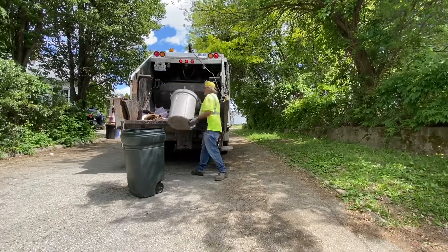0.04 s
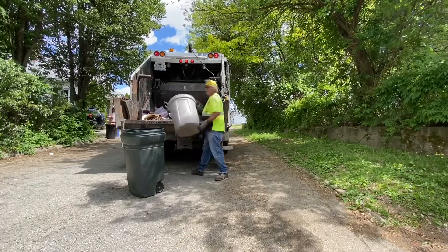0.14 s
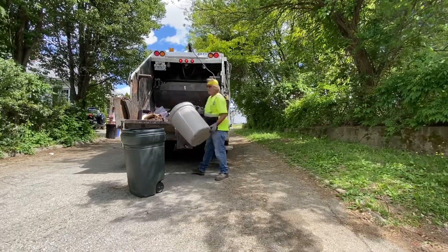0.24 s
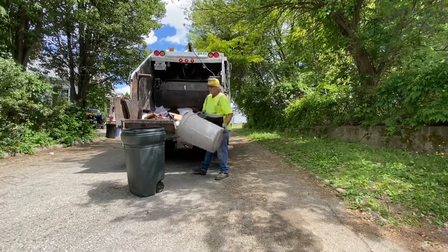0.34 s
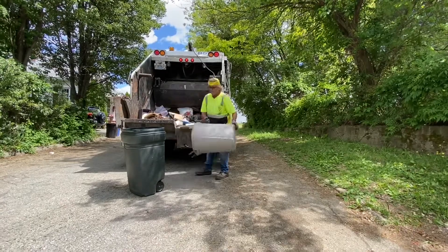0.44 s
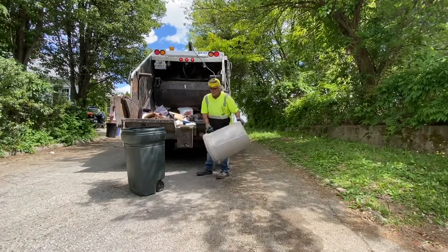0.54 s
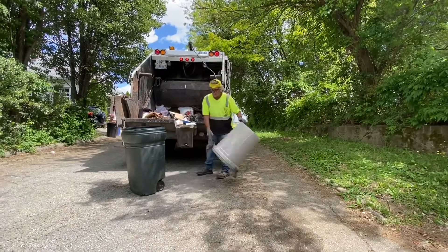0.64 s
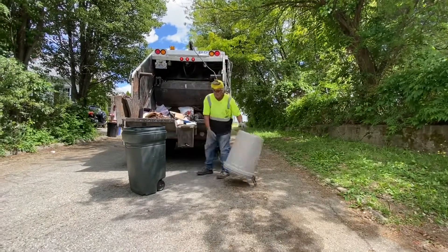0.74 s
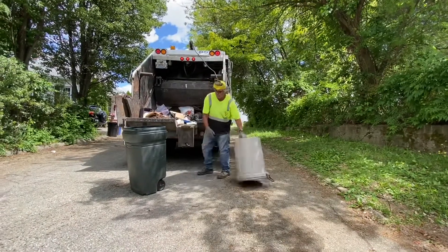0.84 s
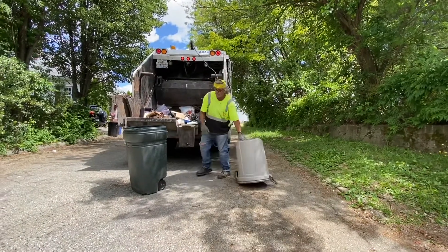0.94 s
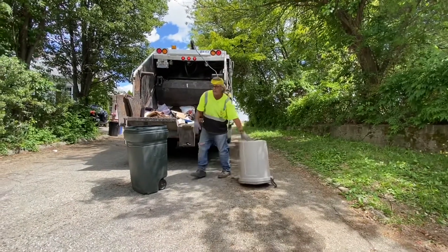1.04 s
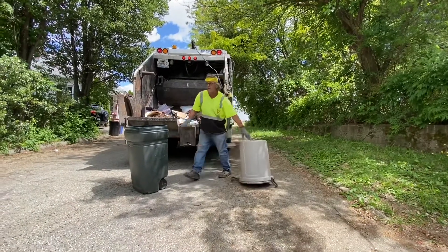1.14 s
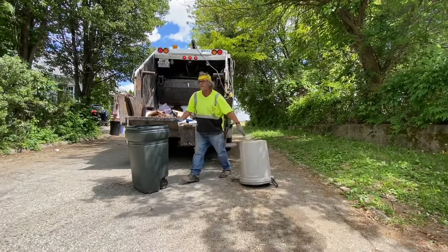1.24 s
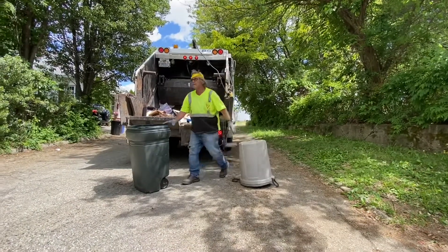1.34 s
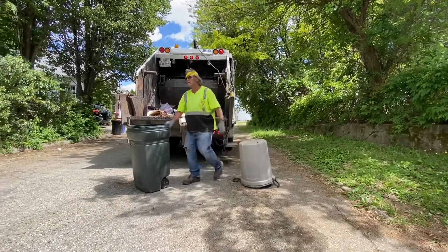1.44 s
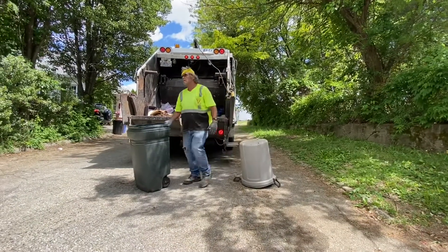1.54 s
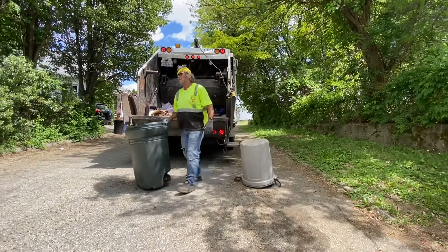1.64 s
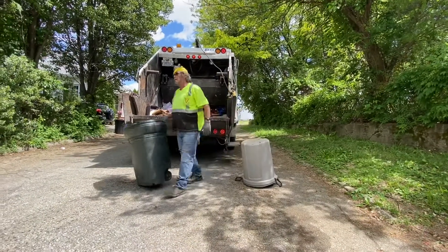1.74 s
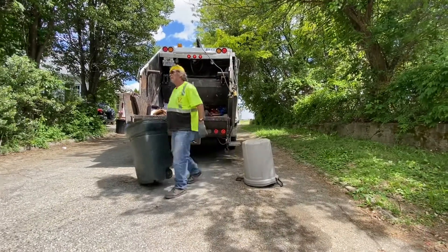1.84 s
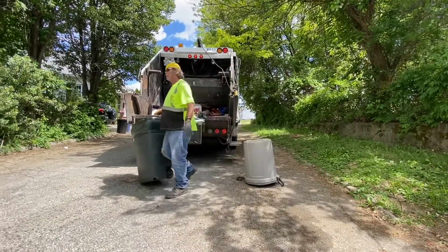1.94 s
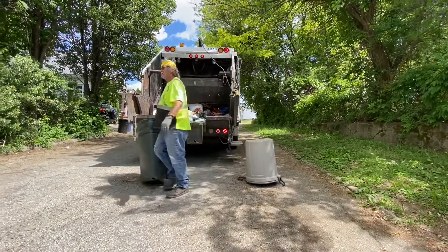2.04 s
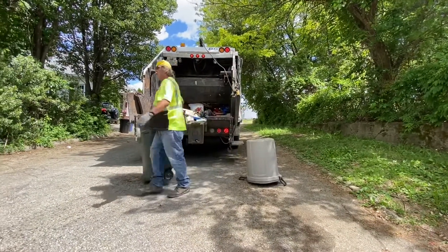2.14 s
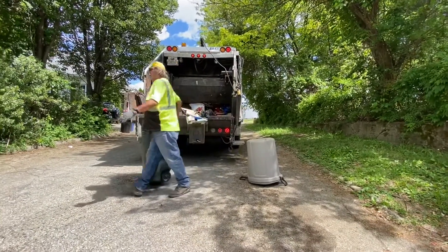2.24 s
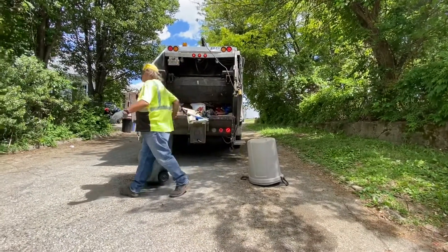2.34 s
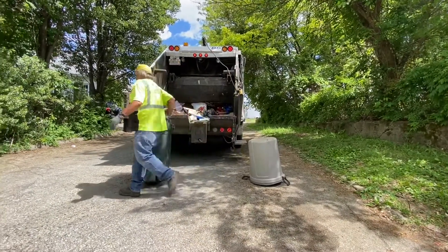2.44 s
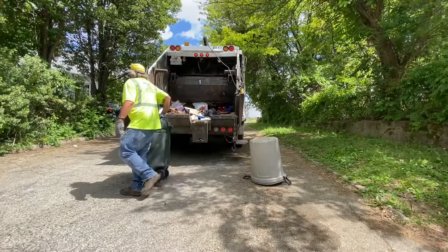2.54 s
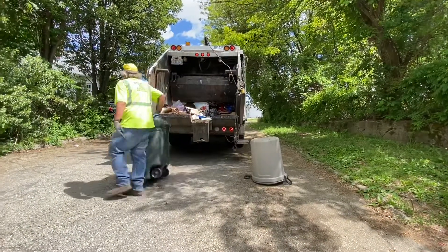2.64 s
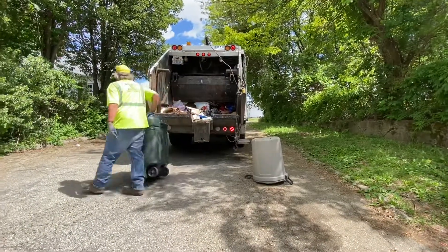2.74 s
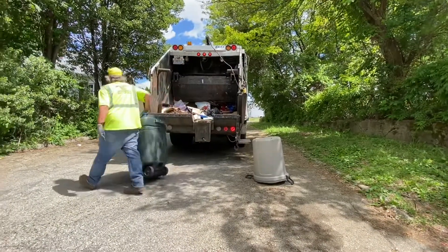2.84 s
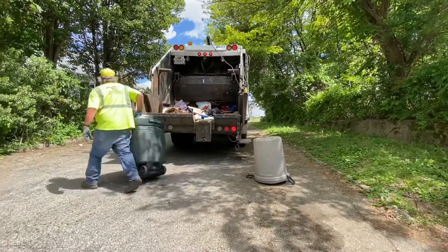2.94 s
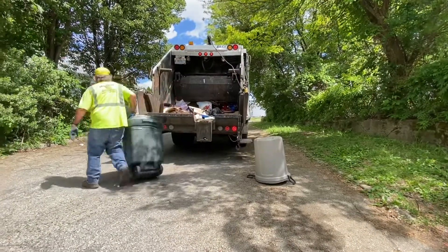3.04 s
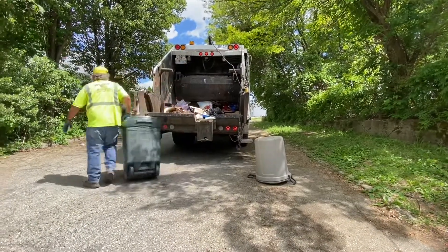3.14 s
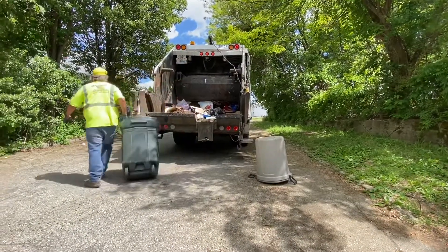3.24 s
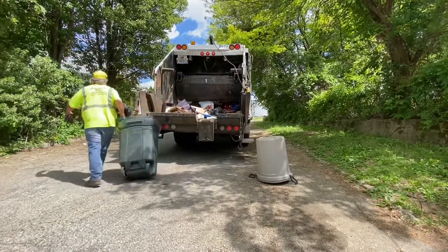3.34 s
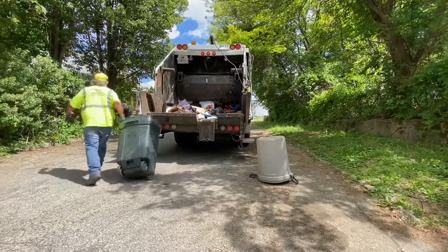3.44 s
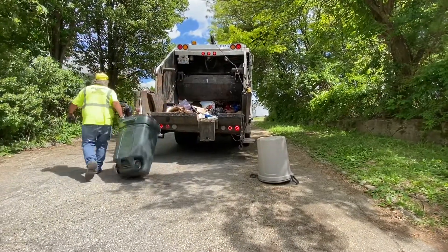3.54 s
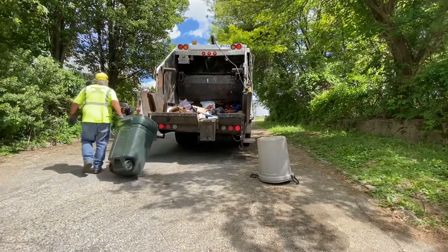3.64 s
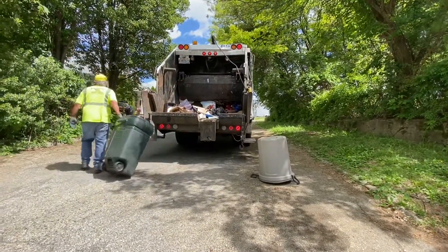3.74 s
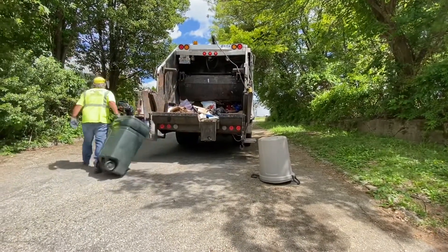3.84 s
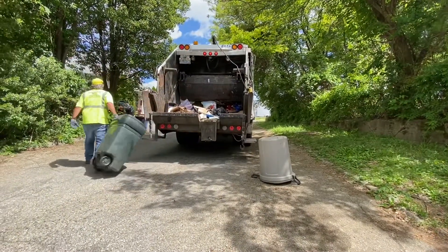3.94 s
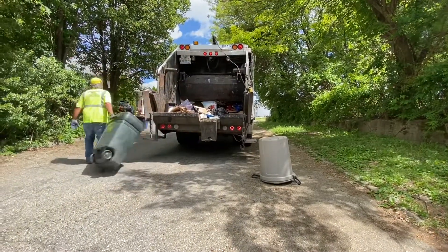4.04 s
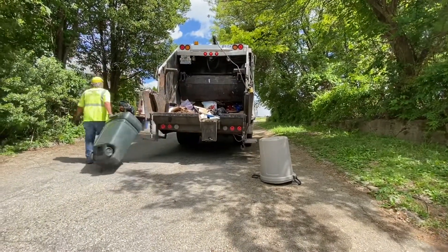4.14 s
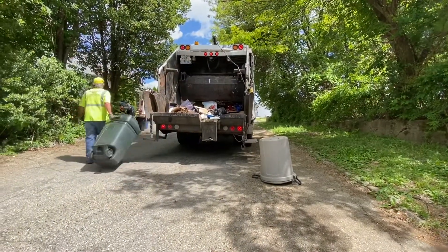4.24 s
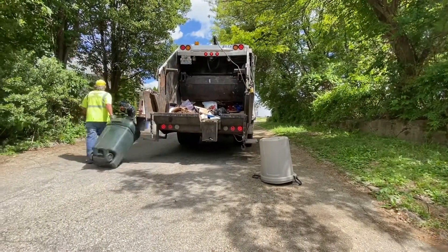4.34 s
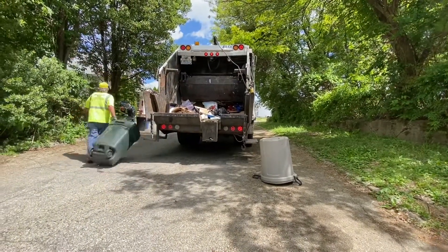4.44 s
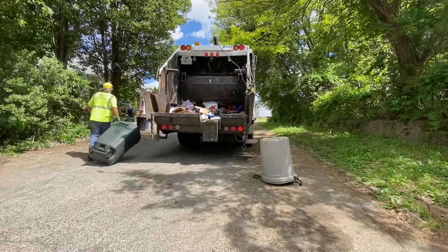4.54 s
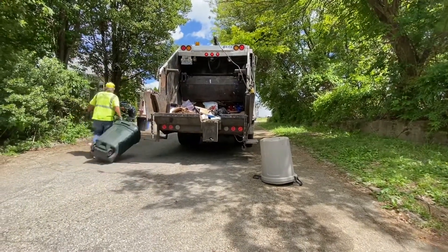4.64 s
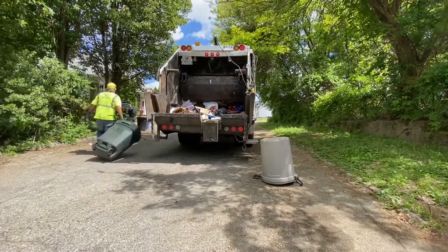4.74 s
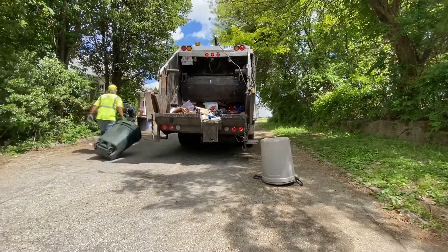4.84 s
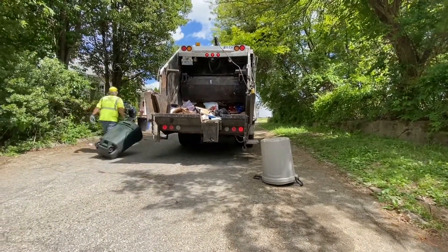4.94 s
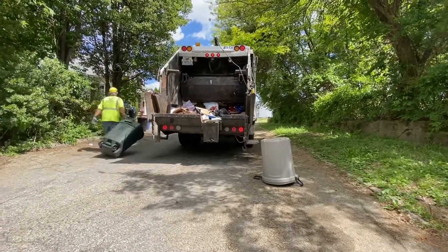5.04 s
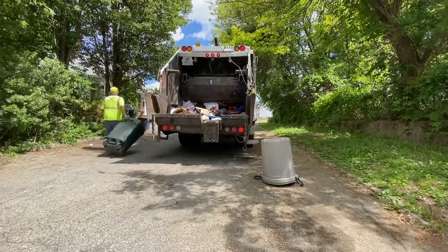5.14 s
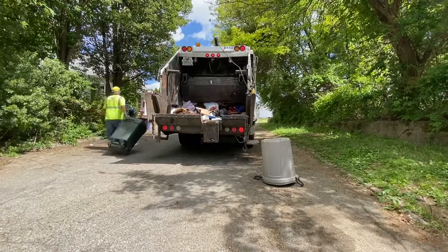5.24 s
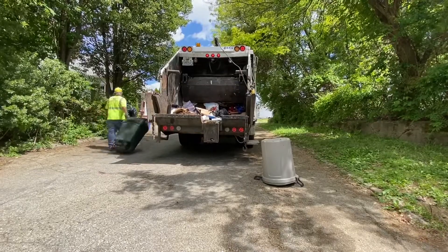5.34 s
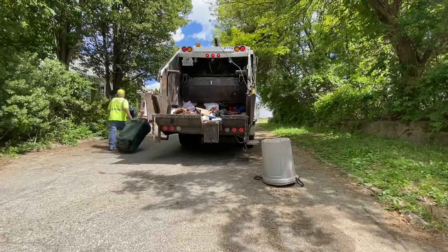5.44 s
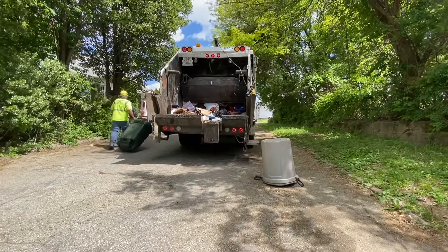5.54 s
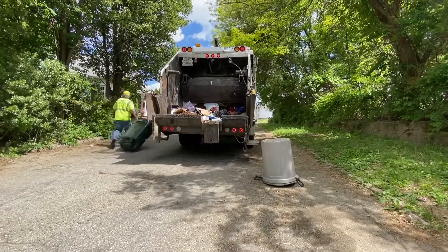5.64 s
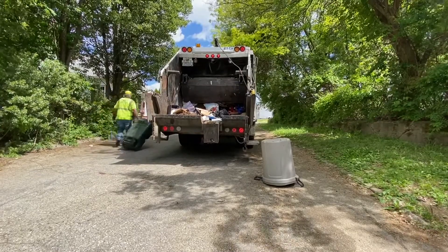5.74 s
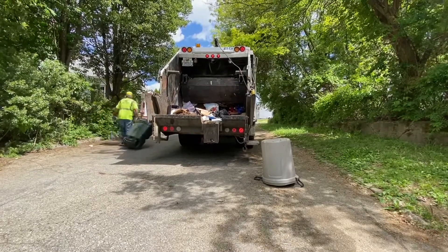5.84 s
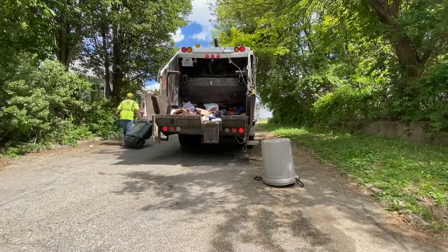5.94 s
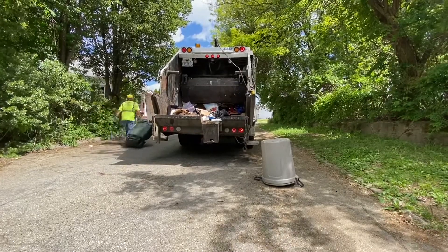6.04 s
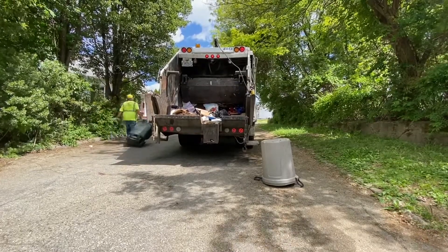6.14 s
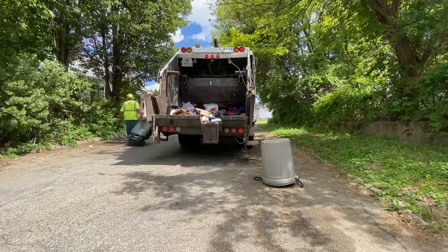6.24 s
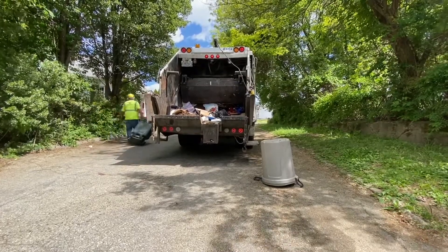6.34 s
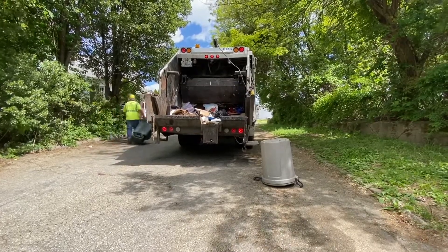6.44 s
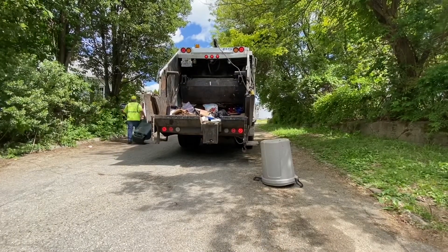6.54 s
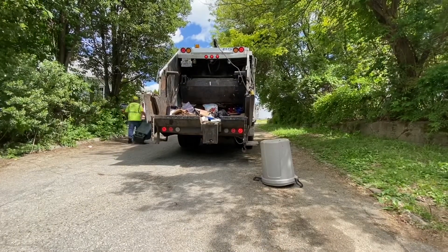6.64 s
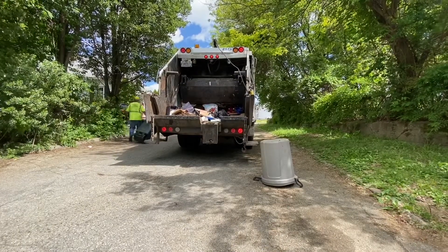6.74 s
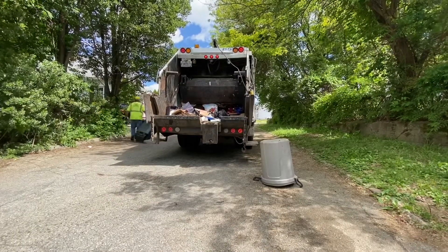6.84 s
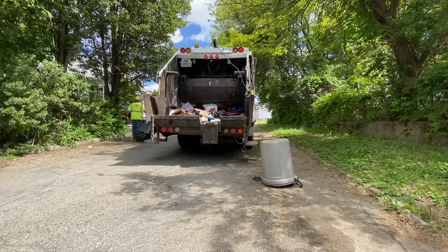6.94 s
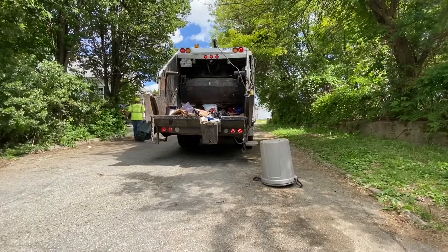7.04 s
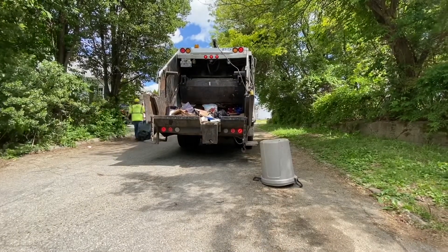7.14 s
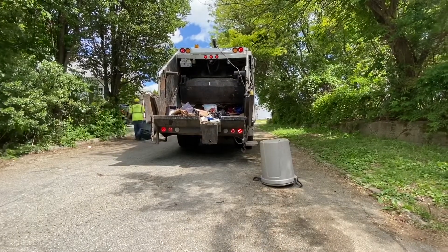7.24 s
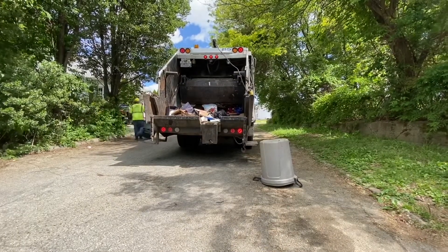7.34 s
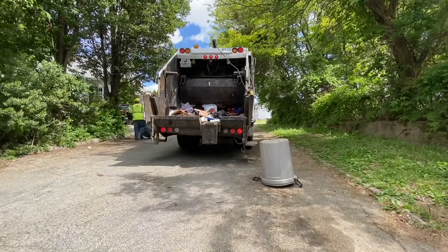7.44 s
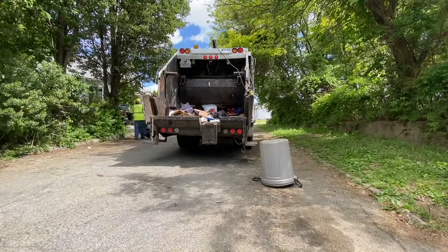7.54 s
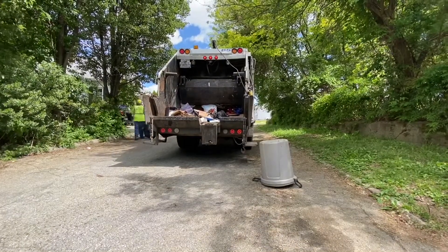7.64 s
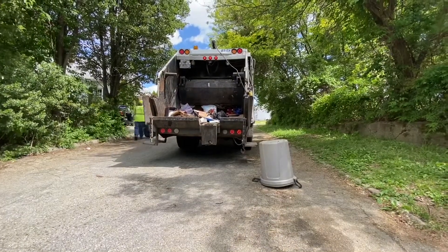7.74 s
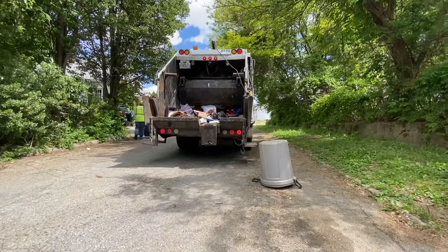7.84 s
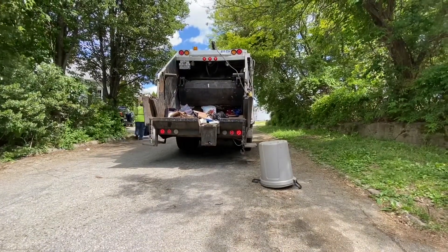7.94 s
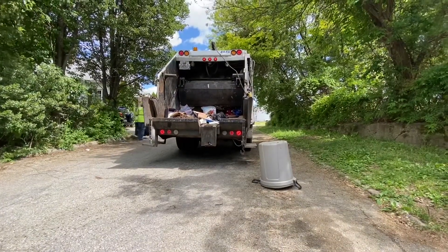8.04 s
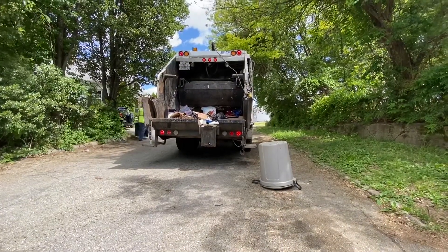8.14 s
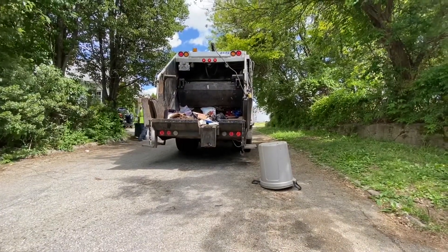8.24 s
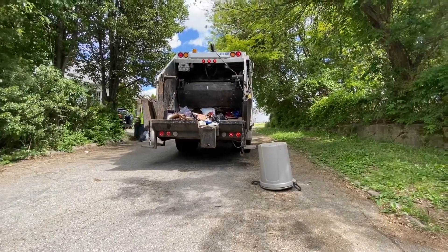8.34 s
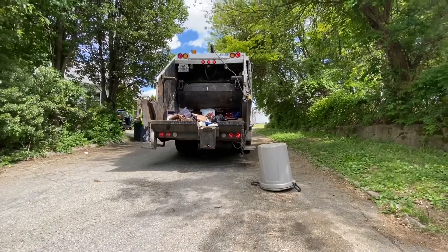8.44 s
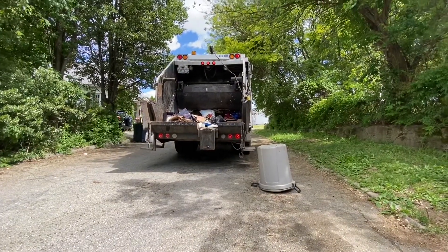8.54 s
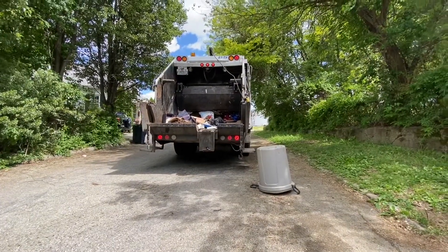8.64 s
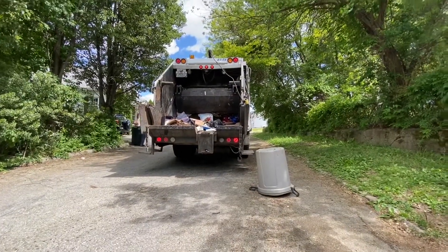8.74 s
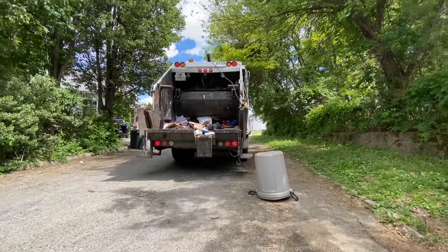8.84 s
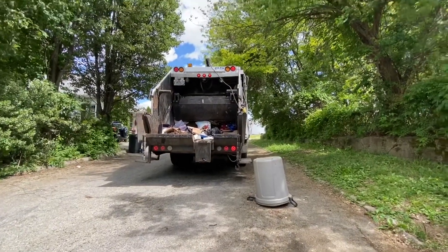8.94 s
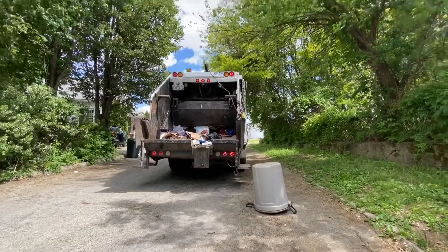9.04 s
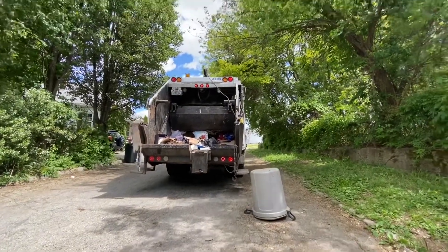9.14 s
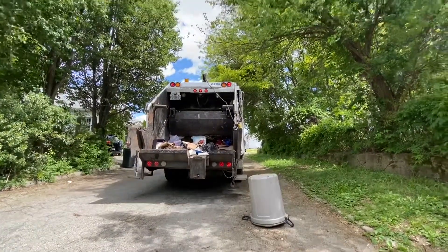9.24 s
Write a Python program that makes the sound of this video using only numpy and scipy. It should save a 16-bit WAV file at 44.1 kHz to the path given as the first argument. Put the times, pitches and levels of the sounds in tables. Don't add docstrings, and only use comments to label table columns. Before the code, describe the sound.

Steady refuse truck idle on a leafy lane; a hollow plastic can drops and rocks, a cart drums and scrapes away, and steel clanks.

```python
import sys
import numpy as np
from scipy import signal
from scipy.fft import rfft, irfft, next_fast_len
from scipy.io import wavfile
from scipy.ndimage import map_coordinates

SR = 44100
rng = np.random.default_rng(int(sys.argv[2]) if len(sys.argv) > 2 else 0)


def boost(x):
    u = np.asarray(x, float) / 20
    return 10 ** u


def bounce(signal):
    frames = np.transpose(np.atleast_2d(signal))
    limited = np.clip(frames, -1, 1)
    pcm = np.round(limited * 32767).astype(np.int16)
    wavfile.write(sys.argv[1], SR, pcm)


N = 409248
TIME = np.arange(N) / SR


def unit(x):
    return x / np.sqrt(np.mean(x ** 2) + 1e-20)


def along(points, hz):
    f, v = np.transpose(points)
    return np.interp(np.log(hz + 1), np.log(f + 1), v)


def curves(rows):
    s, *cols = np.transpose(rows)
    return [np.interp(TIME, s, c) for c in cols]


def wobble(rate):
    knots = rng.standard_normal(int(N * rate / SR) + 4)
    return map_coordinates(knots, [TIME * rate])


def filtered(x, response):
    m = 2 * next_fast_len(N // 2 + 8192)
    return irfft(rfft(x, m) * response(np.fft.rfftfreq(m, 1 / SR)), m)[..., :N]


def resonant(modes, f):
    total = 0
    for k, (centre, width, db) in enumerate(modes):
        total = total + (-1) ** k * boost(db) * 1j * f * width / (centre * centre - f * f + 1j * f * width)
    return total


def causal(points):
    cep = irfft(np.log(boost(along(points, np.fft.rfftfreq(4096, 1 / SR))) + 1e-6))
    cep[1:2048] *= 2
    cep[2049:] = 0
    h = irfft(np.exp(rfft(cep)))
    return h / np.linalg.norm(h)


def placed(x, lead, pan_db):
    side = np.array([[.5], [-.5]])
    return filtered(x, lambda hz: boost(side * pan_db(hz)) * np.exp(2j * np.pi * side * along(lead, hz)))


def rush(colour, alike, gain):
    def mid_and_side(hz):
        turn = np.arccos(np.clip(along(alike, hz), -1, 1)) / 2
        return colour(hz) * [np.cos(turn), np.sin(turn)]

    mid, side = filtered(gain * rng.standard_normal((2, N)), mid_and_side)
    return unit(np.array([mid + side, mid - side]))


def clicks(rows, t60_s):
    out, t = np.zeros(N + SR), np.arange(900) / SR
    for s, db, hz in rows:
        grit = np.convolve(rng.standard_normal(len(t) + 2), [1, -.3, -.7], 'valid')
        snap = 1.7 * np.sin(2 * np.pi * hz * t) + 1.55 * grit * (.7 + boost(-60 * t / .008))
        out[round(s * SR):][:len(t)] += boost(db - 18.0 - 60 * t / t60_s) * snap
    return out[:N]


def rings(rows, sag_s=1e3, rough_db=3):
    out, t = np.zeros(N + SR), np.arange(SR // 4) / SR
    for s, db, hz, t60 in rows:
        turns = hz * sag_s * np.log1p(t / sag_s)
        rattle = np.clip(map_coordinates(rng.standard_normal(90), [t * 300]), -2, 1.5)
        flicker = rough_db * rattle * np.minimum(t / .006, 1)
        rise = 1 - np.exp(-t / min(max(.001, 1.5 / hz), t60 / 15))
        out[round(s * SR):][:len(t)] += boost(db + flicker - 60 * t / t60) * rise * np.sin(2 * np.pi * turns)
    return out[:N]


# pitch_hz, level_db
HOLLOW_TONES = [(78, -3.5), (108, -11), (140, 2), (185, -1.5), (235, -7.5), (300, -12.5)]
BOOM_PER_WEIGHT = 0.92


def blows(events, crack, knock, sharp_db, boom_t60_s, crack_db, knock_db, boom_db):
    parts, t = np.zeros((3, 2, N + SR)), np.arange(SR // 3) / SR
    for s, db, weight, t60, hz in events:
        noise = rng.standard_normal((3, 1, len(t))) + .35 * rng.standard_normal((3, 2, len(t)))
        chatter = boost(3 * np.repeat(rng.standard_normal(len(t) // 90 + 1), 90)[:len(t)])
        rise_s = .0025 + .006 / (1 + boost(db + max(weight, 0) + 24))
        rise = 1 - np.exp(-t / rise_s)
        fade = boost(-60 * t / max(t60, .01))

        first_snap = 1.43 * boost(-60 * t / 0.0083) * (1 - np.exp(-4 * t / rise_s))
        snap = boost(crack_db) * chatter * (fade * rise + first_snap)

        first_push = 0.68 * 0.0025 / rise_s * np.exp(-((t - rise_s) / 0.0009) ** 2)
        ring = boost(knock_db + weight) * (fade ** 0.7 * rise + first_push)

        swell = boost(boom_db + BOOM_PER_WEIGHT * weight - 60 * t / boom_t60_s) * (1 - np.exp(-t / 0.0075))
        air = 0
        for mode, level in HOLLOW_TONES:
            air = air + boost(level) * np.sin(2 * np.pi * (mode * rng.normal(1, 0.0714) * t + rng.random()))

        favoured = boost(sharp_db) * signal.lfilter(*signal.iirpeak(hz, 7, SR), snap * noise[2])
        contact = np.array([snap * noise[0], ring * noise[1], favoured + swell * air])
        parts[:, :, round(s * SR):][..., :len(t)] += boost(db) * contact
    wall = irfft(resonant(knock, np.fft.rfftfreq(8192, 1 / SR)))[:4096]
    colours = np.array([causal(crack), wall / np.linalg.norm(wall)])
    coloured = signal.oaconvolve(parts[:2, :, :N], colours[:, None], axes=2)[..., :N]
    return coloured.sum(axis=0) + parts[2, :, :N]


# pitch_hz, t60_s
LANE = [(150, 0.26), (1000, 0.18), (8000, 0.15)]


def lane(x):
    hz, t, z = signal.stft(rng.standard_normal((2, SR // 2)), SR, nperseg=256)
    fading = z * boost(-60 * t / along(LANE, hz)[:, None])
    tail = signal.istft(fading, SR, nperseg=256)[1]
    late = np.pad(x, ((0, 0), (500, 0)))
    return signal.fftconvolve(late, tail / np.linalg.norm(tail[0]), axes=1)[:, :N]


# start_s, hold_s, drumming_db, grit_under_it_db
TUGS = [(1.57, 0.12, -43.5, -2), (1.86, .1, -59, -4), (3.1, 0.14, -45, -27), (3.66, 0.081, -64, 5),
        (3.79, 0.091, -33, -15.5), (4.34, 0.049, -30, -27), (4.68, 0.22, -34.5, -12),
        (5.325, 0.18, -33.5, -25), (5.7, 0.27, -37.5, -6), (6.02, 0.615, -40, -10), (6.66, 0.38, -42, -20),
        (7.1, 0.19, -42, -17), (7.55, .16, -44.5, -1), (8.3, 0.12, -39, -20)]
# start_s, hold_s, drumming_db, grit_under_it_db
ROLL = (3.5, 7.5, -44, -38)
TUG_ATTACK_S, TUG_RELEASE_T60_S = .05, 0.23


def tugs():
    shell, grit = np.zeros((2, N))
    for s, hold, db, grit_db in [*TUGS, ROLL]:
        rise = np.clip((TIME - s) / TUG_ATTACK_S + 1, 0, 1) ** 2
        shape = rise * boost(-60 * np.maximum(TIME - s - hold, 0) / TUG_RELEASE_T60_S)
        shell = shell + boost(db) * shape
        grit = grit + boost(db + grit_db) * shape
    return shell, grit


# start_s, strength_db
WIND = [(0.0, -41), (0.52, -42.5), (0.85, -41), (1.86, -40), (2.04, -42), (4.29, -41), (4.52, -38),
        (5.81, -38.5), (7.62, -38), (7.88, -44.5), (8.84, -58), (9.28, -44)]
# pitch_hz, level_db
DEEP = [(12, -47), (20, -51), (49, -5), (86, -8), (100, -7), (130, -9), (220, -120)]
# pitch_hz, level_db
BOOM = [(60, -8), (90, -3.5), (115, 4.5), (150, 2), (230, -8), (400, -45)]
DEEP_DB = 8.5
BOOM_DB, BOOM_FOLLOWS = -42, 0.46
EXHAUST_BOOM_DB, HOLLOW_DB = -52, -3.5


def rumble():
    wind_db, = curves(WIND)
    deep = rush(lambda hz: boost(along(DEEP, hz)), [(60, -0.034)], boost(1.2 * wobble(21)))
    boom = rush(lambda hz: boost(along(BOOM, hz)), [(100, 0.19)], boost(0.41 * wobble(24)))
    gusts = boost(BOOM_DB + BOOM_FOLLOWS * (wind_db - wind_db.mean())) + boost(EXHAUST_BOOM_DB)
    hollow = boost(HOLLOW_DB) * tugs()[0]
    return boost(wind_db + DEEP_DB) * deep + (gusts + hollow) * boom


# start_s, level_db
PUMP = [
    (0, -36),
    (.7, -34),
    (2, -34),
    (3.5, -32),
    (4.5, -34.5),
    (6, -33.5),
    (8.5, -35.5),
    (9.28, -34.5),
]
# pitch_hz, level_db (per Hz)
ENGINE = [(120, -23), (200, 7.5), (330, -1), (500, 1), (980, -9), (1400, -8.5), (2800, -9.5), (4500, -18),
          (6500, -18.5), (11000, -18), (16000, -25)]
# pitch_hz, width_hz, level_db
PANELS = [(508, 137, -0.5), (815, 69, 6), (1112, 58, 11.5), (1400, 60, 8.5), (1750, 314, 1.5),
          (3185, 39, 4), (3387, 27, 7), (4660, 450, 8), (6100, 44, -8), (6300, 230, -17)]
# pitch_hz, likeness (-1 to 1)
ALIKE = [(60, .3), (180, 0.16), (550, 0.47), (1650, 0.22), (2500, 0.092), (3200, 0.56), (4000, 0.043),
         (8000, 0.7), (10000, 0.5), (11000, 0.38), (16000, .97)]
PUMP_HZ = 161.6


def truck():
    cycle = np.cumsum(11.0 + 0.13 * wobble(2.4)) / SR
    cylinder_db = np.array([0, -1.5, -.5, -2, -.3, -1.2])[(3 * cycle).astype(int) % 6]
    firing = boost(cylinder_db - 2.5 * (3 * cycle % 1))
    body = lambda hz: boost(along(ENGINE, hz)) * (1 + 2.15 * abs(resonant(PANELS, hz)))
    clatter = boost(-38.0 - 0.0033 * TIME) * rush(body, ALIKE, firing)

    load_db, = curves(PUMP)
    turn = 2 * np.pi * PUMP_HZ * TIME + .1 * wobble(12)
    tone = np.sin(turn) + boost(-26) * np.sin(2 * turn)
    return clatter + np.sqrt(2) * boost(load_db + .7 * wobble(14)) * tone


def exhaust():
    level_db = -45 - 12 * np.clip(TIME - 7.6, 0, 1) + 3 * wobble(4.5)
    return boost(level_db) * np.sin(2 * np.pi * 115 * TIME + 1.2 * wobble(12))


# start_s, level_db, pitch_hz
TICKS = [(0.3052, -33, 6600), (0.3187, -25, 7200), (0.33, -29, 9800), (0.338, -30, 11000),
         (0.347, -30, 7000), (0.388, -26, 10500), (0.41, -30, 9000), (1.07, -25, 7060),
         (1.3294, -26.5, 6650), (1.482, -28, 8100), (1.4955, -29, 6360), (1.8397, -27, 8670),
         (1.868, -28, 10100), (1.9889, -27, 10800), (2.1136, -23, 6540), (2.156, -24, 6360),
         (2.341, -19, 11000), (3.053, -28, 8190), (3.2294, -34, 5780), (1.402, -38, 11500),
         (1.5795, -25, 4160), (6.965, -20, 9700), (6.973, -17.5, 6400), (7.567, -31, 10500),
         (1.594, -28, 9000), (1.607, -27, 8500), (1.64, -23, 9500), (1.667, -19, 8600), (1.673, -20, 6500)]


def boots():
    return clicks(TICKS, t60_s=.028)


# pitch_hz, level_db (per Hz)
STEEL_CRACK = [(650, -45), (1100, -48), (1360, -18), (1530, -14.5), (1670, -14), (1980, -11), (2380, -16.5),
               (4500, -24), (12000, -54), (15600, -75), (22000, -120)]
# pitch_hz, width_hz, level_db
DARK_KNOCK = [(413, 81, -3), (567, 176, -1.5), (978, 130, -1.5), (1400, 106, -6)]
# start_s, crack_peak_db, weight_db, favoured_pitch_hz
TAPS = [
    (2.327, -40.5, 3, 2580),
    (2.36, -44, 4, 1140),
    (3.19, -40, 3.5, 1400),
    (8.827, -27.5, -9.5, 1420),
    (9.112, -36.5, -18, 1750),
]
# start_s, level_db, pitch_hz
LINKS = [
    (9.165, -17, 2500),
    (8.587, -14, 2400),
    (8.7912, -17, 2000),
    (8.792, -12, 3020),
    (8.8302, -11, 1580),
    (8.839, -6, 1470),
    (8.8463, -9.5, 1520),
    (8.8565, -24, 1500),
    (8.89, -17, 2200),
]


def truck_taps():
    contacts = [(s, db, weight, 0.066, hz) for s, db, weight, hz in TAPS]
    taps = blows(contacts, STEEL_CRACK, DARK_KNOCK, sharp_db=23.0, boom_t60_s=0.079,
                 crack_db=-0.94, knock_db=8.6, boom_db=-37)
    return taps + rings([(*row, 0.004) for row in LINKS])


# pitch_hz, width_hz, level_db
STEEL_KNOCK = [(355, 27, -6), (536, 22, 0.5), (1050, 160, -12)]
# start_s, crack_peak_db, weight_db, t60_s, favoured_pitch_hz
CLANKS = [
    (6.9008, -11.5, -7, 0.16, 1900),
    (6.9054, -8, -8.5, 0.16, 1750),
    (6.9116, -8, -6, 0.065, 1600),
    (6.939, -19, -2, 0.17, 2000),
    (6.9688, -33, 6, 0.12, 1780),
]
# start_s, level_db, pitch_hz, t60_s
HOPPER_RINGS = [(6.908, -13, 1500, .04), (6.911, -12, 1950, .035), (6.909, -20.5, 540, 0.32),
                (6.913, -18, 330, 0.18), (6.925, -20, 1050, 0.14), (6.928, -29, 3430, .1),
                (6.912, -23, 1868, 0.17), (1.604, -25, 500, 0.15), (1.6167, -25, 2320, .03),
                (1.628, -37, 2060, .03), (1.639, -22, 2350, 0.046), (1.662, -30, 2350, 0.052),
                (1.615, -33, 3400, .06), (1.637, -30, 3950, .06), (1.628, -28, 560, 0.065),
                (1.642, -32, 1000, .06)]
# start_s, crack_peak_db, weight_db, t60_s, favoured_pitch_hz
SCUFF = [
    (1.6, -32, -6, .1, 1750),
    (1.6147, -22.5, -11, 0.17, 3880),
    (1.634, -22, -11, 0.2, 2290),
    (1.6457, -22, -14, 0.049, 2290),
    (1.6644, -21, -12, 0.04, 4200),
]
# pitch_hz, level_db (per Hz)
PALE_CRACK = [(760, -27), (1300, -5), (2200, -7), (3000, -11), (4000, -13.5), (5400, -9.5), (6500, -12),
              (7600, -12.5), (11000, -11.5), (16000, -16)]


def steel_hopper():
    steel = blows(CLANKS, STEEL_CRACK, STEEL_KNOCK, sharp_db=2, boom_t60_s=0.17,
                  crack_db=-11.0, knock_db=-3.0, boom_db=-5.5)
    scuff = blows(SCUFF, PALE_CRACK, DARK_KNOCK, sharp_db=10.0, boom_t60_s=.3,
                  crack_db=-7.5, knock_db=-2, boom_db=-15)
    return steel + rings(HOPPER_RINGS) + scuff


# start_s, level_db, pitch_hz
THUMPS = [(0.749, -12, 113), (0.876, -13, 106), (1.631, -22, 113), (1.803, -25, 95), (2.141, -22, 158),
          (3.866, -18, 142), (3.882, -22, 110), (4.312, -8, 114.5), (4.539, -19.5, 74), (4.851, -28, 107),
          (5.284, -13, 114), (5.397, -15, 84.4), (5.572, -15, 113), (7.139, -17.5, 74), (7.212, -17, 74.6),
          (7.341, -31, 152), (7.524, -16, 117), (7.734, -19.5, 96), (7.893, -23, 123), (8.385, -20.5, 135),
          (0.772, -16, 150), (8.33, -27, 172)]


def thumps():
    out, t = np.zeros(N + SR), np.arange(SR // 4) / SR
    rise = 1 - np.exp(-t / 0.0077)
    for s, db, hz in THUMPS:
        fade = boost(db + 2.5 - 60 * t / 0.16)
        out[round(s * SR):][:len(t)] += fade * rise * np.sin(2 * np.pi * hz * t)
    return out[:N]


# pitch_hz, level_db (per Hz)
SHELL = [(100, -61), (170, -4), (357, -16), (554, -11.5), (794, -29.5), (919, -17.5), (1270, -32),
         (1420, -16), (1560, -28), (2500, -27), (3250, -73), (5500, -120)]
# pitch_hz, level_db (per Hz)
GRIT = [(880, -46), (1500, -29.5), (2700, 3), (4200, 1), (5000, 2), (6800, -4), (12000, -5), (16000, -36)]


def drag():
    shell_gain, grit_gain = tugs()
    lumps = boost(3.5 * wobble(35))
    shell = rush(lambda hz: boost(along(SHELL, hz)), [(300, .8), (1500, .7)], lumps)
    grains = boost(2.5 * wobble(40) + 3.5 * wobble(400))
    grit = rush(lambda hz: boost(along(GRIT, hz)), [(3000, .7), (11000, .9)], grains)
    return shell_gain * shell + grit_gain * grit


# pitch_hz, level_db (per Hz)
DARK_CRACK = [(760, -5.5), (1300, -5.5), (1900, 10), (2600, 0), (4200, -3), (5500, -7), (6500, -8),
              (11000, -10), (16000, -20)]
# start_s, crack_peak_db, weight_db, t60_s, favoured_pitch_hz
SKIDS = [(3.7346, -24.5, -5, 0.16, 4500), (3.8515, -12, 3.5, 0.07, 3970), (3.744, -29, -9, 0.042, 4040),
         (3.779, -26, -9, .05, 4690), (3.794, -23.5, -5, 0.044, 3700), (3.826, -26, -9, .04, 4300),
         (4.3015, -13.5, -5, 0.062, 4750), (4.5152, -21, -16, 0.12, 3580), (4.6513, -29.5, -3, 0.29, 3780),
         (5.2789, -18.5, -2.5, 0.063, 6100), (5.6928, -26, -4, 0.13, 3560), (5.745, -32.5, -5, 0.5, 6500),
         (5.8385, -21.5, -3, 0.13, 4530), (6.8425, -29, -9, 0.53, 3500), (7.022, -28.5, 0, 0.12, 6500),
         (7.637, -23, -2, 0.11, 4660), (7.6594, -30, -19, 0.11, 4300)]
# start_s, crack_peak_db, weight_db, t60_s, favoured_pitch_hz
FLUTTER = [
    (5.562, -26.5, -4, 0.096, 4100),
    (5.6, -24.5, -2, 0.083, 4300),
    (5.656, -23.5, -10, 0.052, 5000),
]
# start_s, crack_peak_db, weight_db, t60_s
BUMPS = [(1.8882, -33, 10.5, 0.063), (3.6397, -19, -2, 0.093), (3.689, -23, -2, 0.16),
         (3.709, -22, -23, 0.083), (4.326, -27.5, 8, 0.099), (4.529, -23.5, -2, 0.12),
         (4.7488, -28, 4, 0.041), (4.9004, -35.5, 14.5, 0.032), (5.304, -28.5, 7, 0.093),
         (5.3895, -27, 1, 0.14), (5.4857, -25, 2.5, 0.068), (5.7782, -19.5, -6.5, 0.14),
         (6.0598, -38, 13, 0.068), (6.189, -28.5, 1, 0.15), (6.216, -24, -7, 0.05),
         (6.2813, -32.5, -0.5, 0.18), (6.378, -27.5, -8, 0.13), (7.0682, -35.5, 17.5, 0.033),
         (7.5958, -29.5, 0.5, 0.2), (8.254, -35.5, 17, 0.065)]
# start_s, level_db, pitch_hz, t60_s
DARK_RINGS = [(3.8515, -10, 3930, 0.025), (3.852, -10.5, 594, 0.057), (3.854, -10, 879, 0.064),
              (3.856, -10, 1456, 0.05), (4.513, -23, 3590, 0.055), (6.284, -21, 534, 0.056),
              (4.515, -23, 2950, .04), (4.654, -28, 564, .1), (4.744, -26.5, 576, .1),
              (4.755, -33, 1050, .06), (4.891, -24, 489, 0.1), (5.281, -29, 970, .06),
              (5.306, -23.5, 1336, .08), (5.332, -21, 538, .08), (5.4, -21, 824, .07),
              (5.405, -25, 1400, .1), (5.42, -20, 1000, .06), (5.488, -24, 963, .06),
              (5.49, -24, 1900, .04), (5.778, -20, 1106, .07), (5.779, -26, 1870, 0.083),
              (5.839, -24, 1000, .04), (6.066, -25, 950, .05), (5.659, -31, 3500, .03),
              (5.279, -24.5, 4540, 0.021), (8.252, -25, 2000, .04), (8.269, -30, 2050, .03),
              (2.859, -25, 3800, .015), (2.86, -30, 2500, .012), (7.6355, -20, 6500, .02),
              (5.8445, -22, 6550, 0.023), (5.838, -21, 3500, .025), (4.302, -22, 3010, .05),
              (5.785, -15, 3020, .04), (5.785, -22, 7100, .04), (8.791, -24, 803, .06)]
# start_s, level_db, pitch_hz, t60_s
SLAPS = [
    (8.2505, -13.5, 1190, 0.045),
    (8.261, -18, 416, 0.11),
]
# start_s, level_db, pitch_hz
SNAPS = [(3.8525, -10, 11500), (7.636, -14, 6440), (5.279, -18, 6100), (4.3015, -19, 5030),
         (4.308, -11, 7800), (5.778, -7, 11500), (5.78, -5, 4130), (5.8385, -9, 3570), (5.8452, -5, 6480),
         (6.187, -29, 11000), (6.29, -18, 10200), (6.395, -29, 11000)]
LID_HZ = 1900


def wheeled_bin():
    contacts = SKIDS + FLUTTER + [(*row, LID_HZ) for row in BUMPS]
    knocks = blows(contacts, DARK_CRACK, DARK_KNOCK, sharp_db=6.2, boom_t60_s=0.36,
                   crack_db=-3.0, knock_db=-1.1, boom_db=-8.0)
    return knocks + rings(DARK_RINGS) + rings(SLAPS, sag_s=.008) + clicks(SNAPS, t60_s=0.01)


# pitch_hz, width_hz, level_db
PALE_KNOCK = [(375, 54, -3), (476, 96, 7.5), (600, 68, 7), (790, 170, 4.5), (1180, 53, 1), (1380, 150, -7)]
# start_s, crack_peak_db, weight_db, t60_s, favoured_pitch_hz
DROP = [(.7184, -8.5, 1.5, 0.065, 3750), (.7234, -14.5, 4.5, 0.11, 790), (.8055, -17, -7, .09, 2100),
        (.8126, -11.5, -3, 0.11, 3380), (.8207, -12, 2, 0.032, 990), (.8342, -17, -3, 0.19, 4130),
        (.8694, -11.5, 1, 0.11, 6000), (.9285, -14, -8, .2, 3510), (.9428, -14, -10, 0.12, 2370),
        (.9812, -9.5, -9.5, 0.094, 3660), (1.0092, -28, -25, 0.17, 3760)]
# start_s, level_db, pitch_hz, t60_s
PALE_RINGS = [(.7193, -17, 3670, 0.032), (.7193, -25, 6380, .03), (.7225, -5, 865, 0.065),
              (.7245, -12.5, 756, 0.096), (.727, -14, 478, 0.2), (.7245, -23, 1100, 0.088),
              (.8126, -19, 2410, .04), (.818, -9.5, 1000, 0.034), (.82, -11.5, 436, .05),
              (.822, -25, 4050, 0.1), (.869, -20, 6370, 0.027), (.872, -22, 570, 0.078),
              (.872, -22, 1790, .1), (.9343, -27, 3900, 0.042), (.947, -25, 2460, .05),
              (.9812, -27, 3650, 0.084), (.9812, -29, 4030, .09), (.9812, -23, 6400, .03),
              (.982, -18, 1720, 0.027), (.807, -24, 1750, .04), (.838, -23, 894, 0.083),
              (.928, -25, 3500, .04), (.94, -27, 1500, .08), (.84, -28, 4300, .04)]


def pale_bin():
    knocks = blows(DROP, PALE_CRACK, PALE_KNOCK, sharp_db=5.3, boom_t60_s=0.53,
                   crack_db=-9.0, knock_db=-3, boom_db=-10.5)
    return knocks + rings(PALE_RINGS)


# pitch_hz, lead_turns
TRUCK_LEAD = [(100, 0), (1000, .13), (2500, .3), (3500, .5), (4200, 1)]
BIN_LEAD = [(100, 0), (500, .13), (1200, .3), (2600, .5), (4000, .85), (5200, .63), (6500, 1)]
HOPPER_LEAD = [(100, 0), (500, .07), (2400, .1), (3100, .26), (4000, .26), (5200, -.05), (6500, -.12),
               (8000, 0)]
PALE_LEAD = [(2500, -.04), (3100, .3), (3800, -.07), (6500, -.1), (8000, 0)]
# pitch_hz, level_db
PALE_PAN = [(500, -1), (2400, -6.5), (4000, 5.5), (6500, -7), (8600, 3), (11000, 0)]


def scene():
    pale, dark, steel, taps = pale_bin(), wheeled_bin(), steel_hopper(), truck_taps()
    mix = placed(dark + drag() + thumps(), BIN_LEAD, lambda hz: 2.5)
    mix = mix + placed(truck() + exhaust() + taps, TRUCK_LEAD, lambda hz: -.4)
    mix = mix + placed(steel, HOPPER_LEAD, lambda hz: 0)
    mix = mix + placed(pale, PALE_LEAD, lambda hz: along(PALE_PAN, hz))
    tail = boost(-12) * lane(pale + dark + steel + taps)
    return mix + boots() + tail + rumble()


# pitch_hz, level_db
PORT = [(5000, 0.5), (5450, -2), (5750, 4.5), (6150, -7), (6350, 0.5), (7500, -0.5), (7750, -1),
        (8200, -2.5), (15600, -13), (16000, -60)]
# pitch_hz, lead_turns
PORT_LEAD = [(4200, 0), (5500, .5), (6500, 1), (7800, 1.5), (8200, 2), (9200, 2.25), (10200, 2),
             (11900, 1.97), (12700, 1.5), (14200, 1.5), (15000, 1)]
# pitch_hz, level_db
TILT = [(60, -1), (170, -4), (500, -1), (4000, 1), (7000, 2), (9000, -11.5), (11000, -4), (13000, -0.5)]


def microphone(dry):
    coloured = filtered(dry, lambda hz: boost(along(PORT, hz)))
    return placed(coloured, PORT_LEAD, lambda hz: along(TILT, hz))


def top_cut(x):
    return signal.sosfilt(signal.butter(12, 16820, fs=SR, output="sos"), x)


def record(dry):
    ports = microphone(dry)
    finished = ports / (1 + np.abs(ports / .97) ** 6) ** (1 / 6)
    return top_cut(finished)


dry = scene()
out = record(dry)
bounce(out)
```